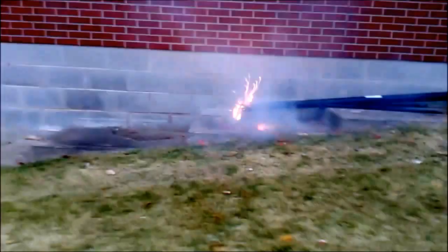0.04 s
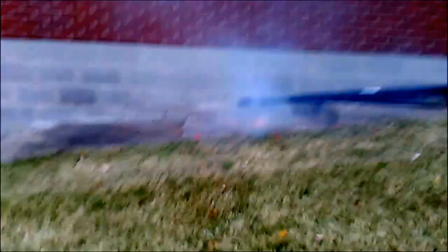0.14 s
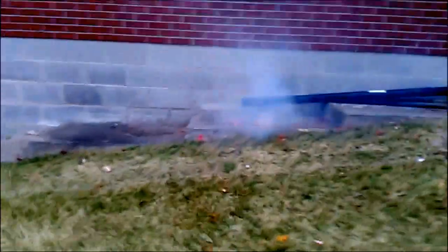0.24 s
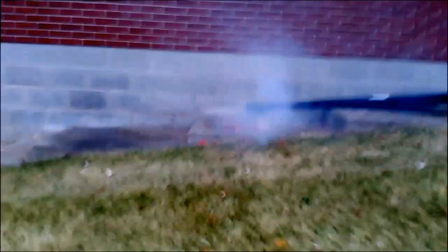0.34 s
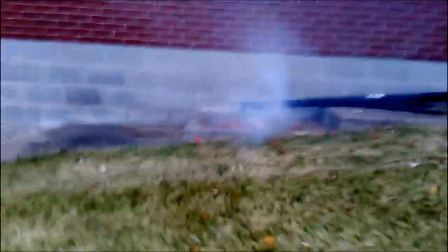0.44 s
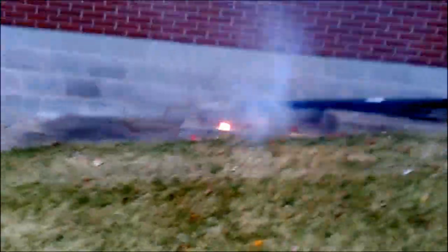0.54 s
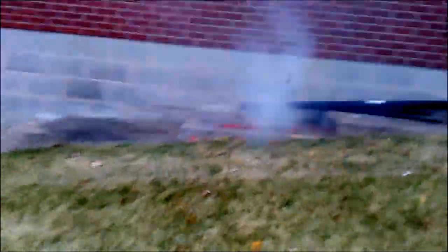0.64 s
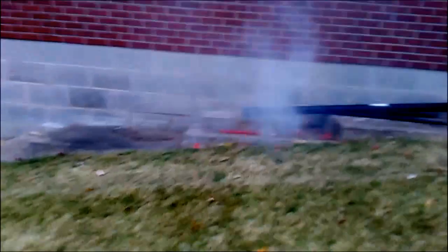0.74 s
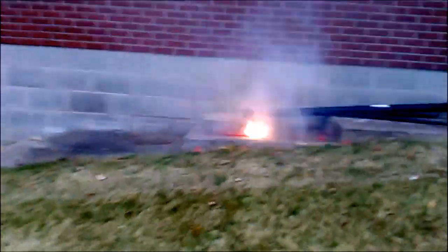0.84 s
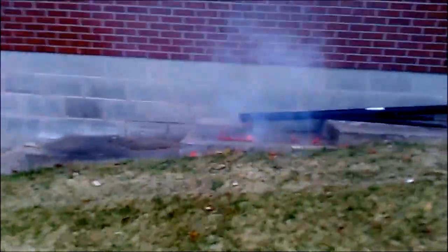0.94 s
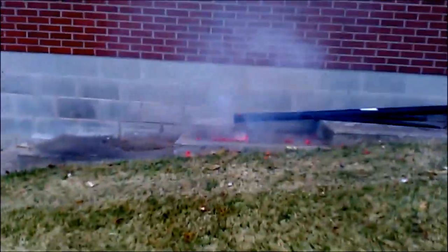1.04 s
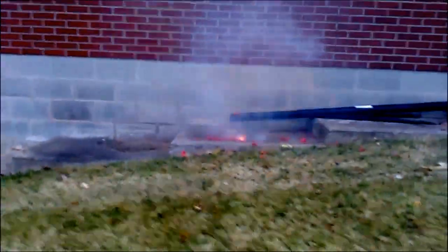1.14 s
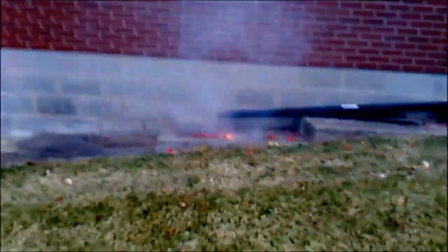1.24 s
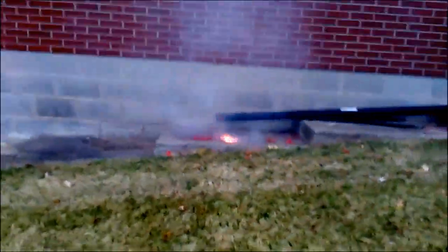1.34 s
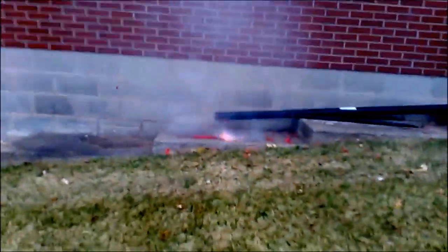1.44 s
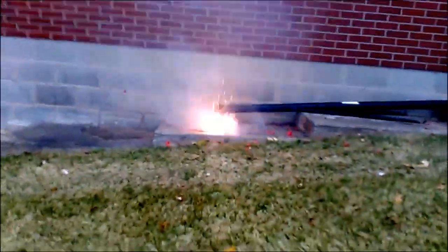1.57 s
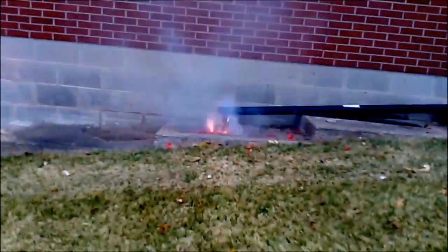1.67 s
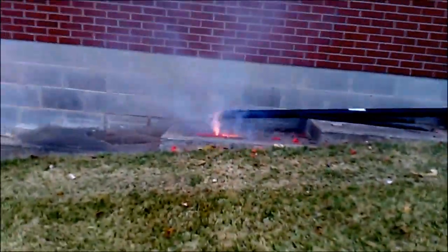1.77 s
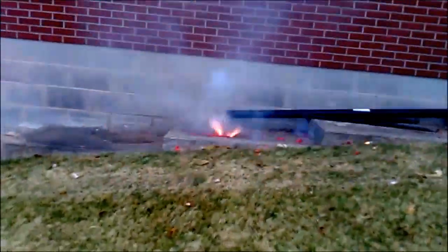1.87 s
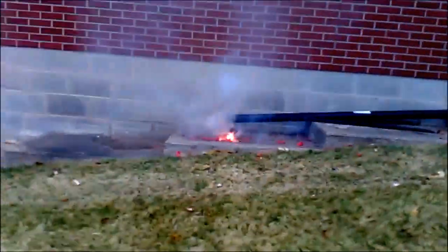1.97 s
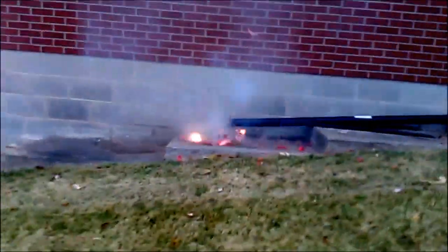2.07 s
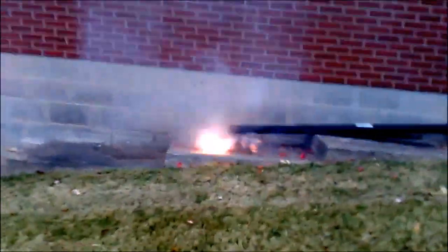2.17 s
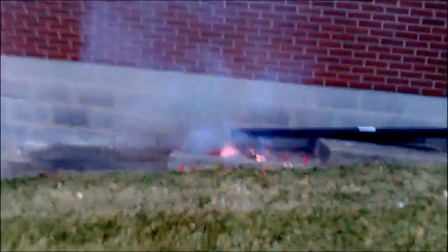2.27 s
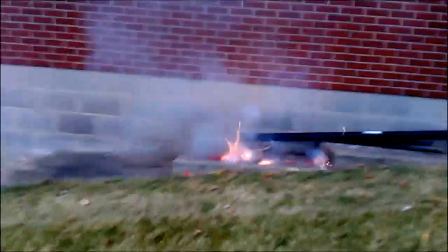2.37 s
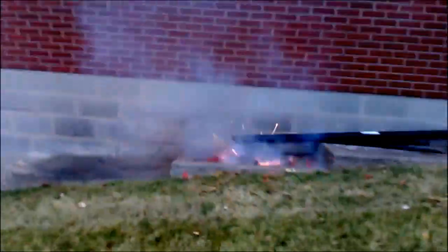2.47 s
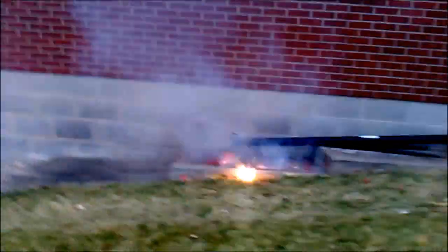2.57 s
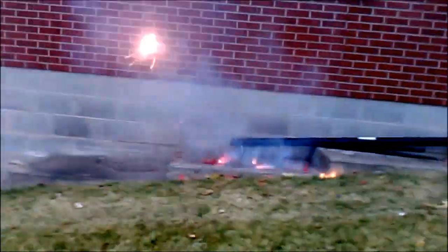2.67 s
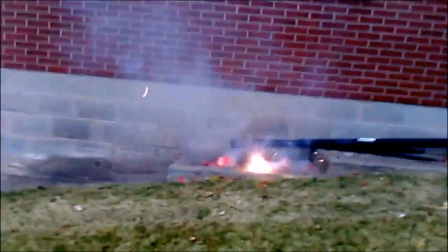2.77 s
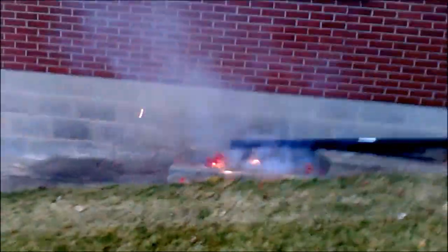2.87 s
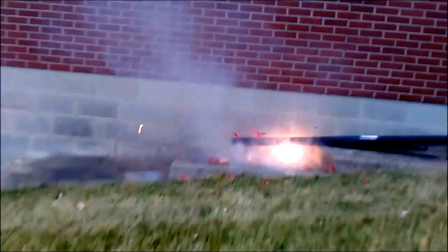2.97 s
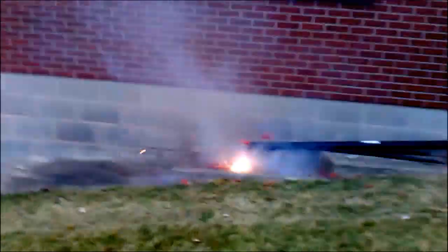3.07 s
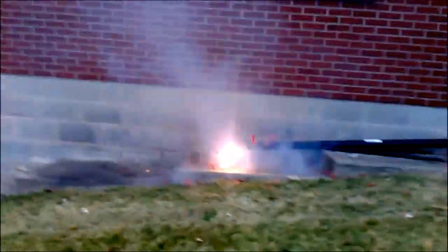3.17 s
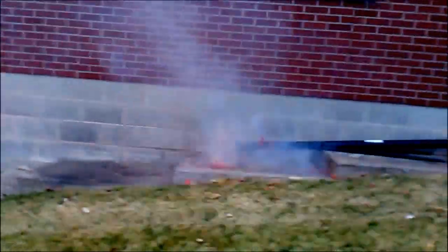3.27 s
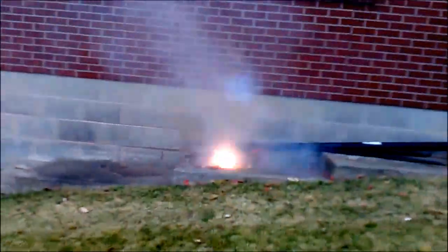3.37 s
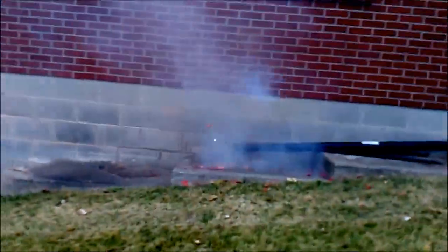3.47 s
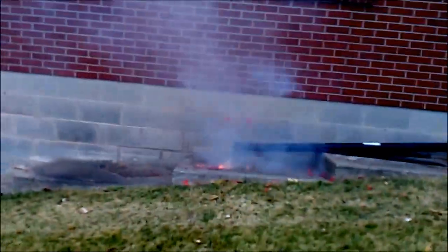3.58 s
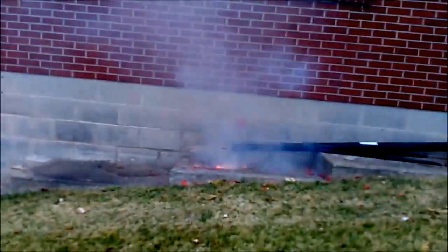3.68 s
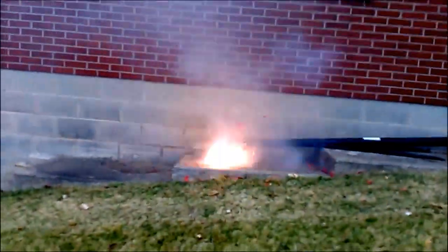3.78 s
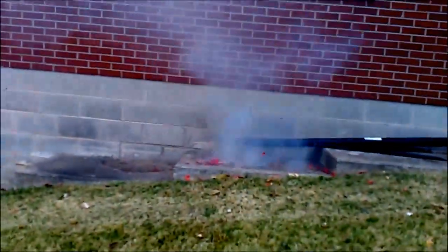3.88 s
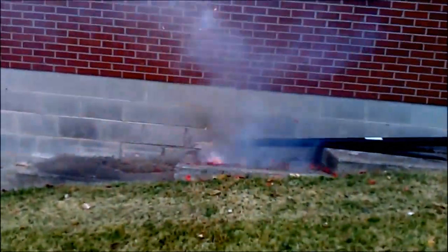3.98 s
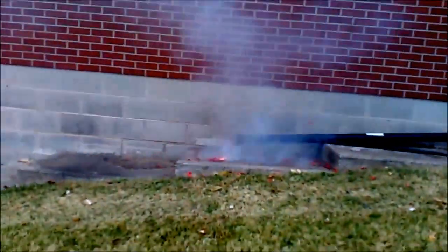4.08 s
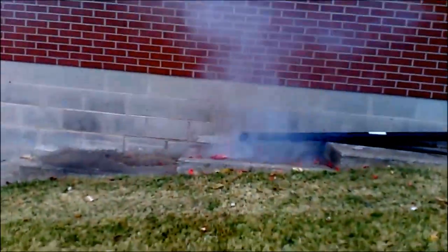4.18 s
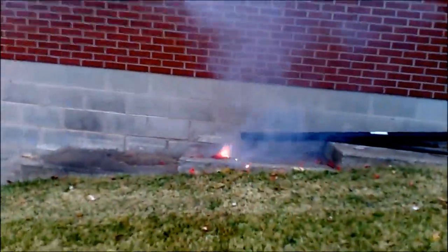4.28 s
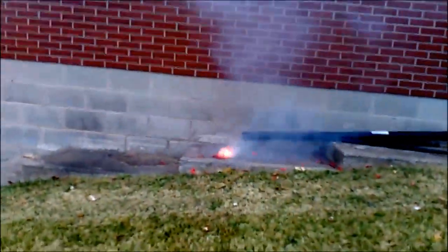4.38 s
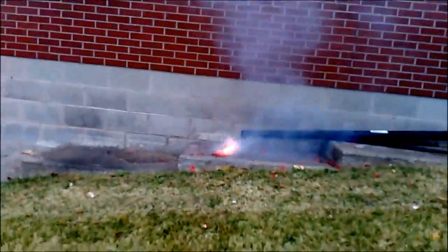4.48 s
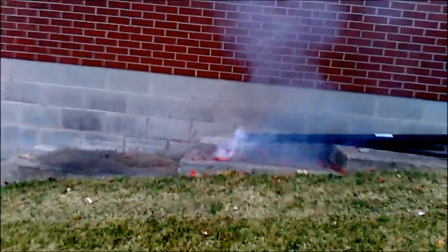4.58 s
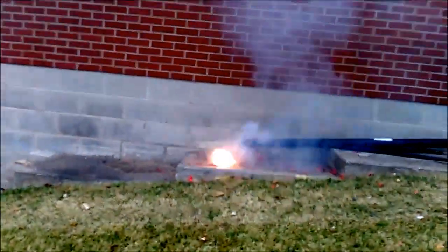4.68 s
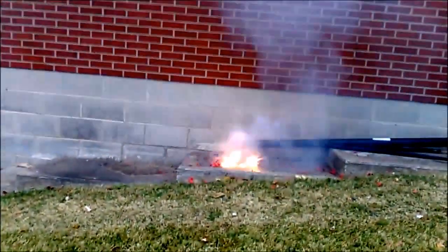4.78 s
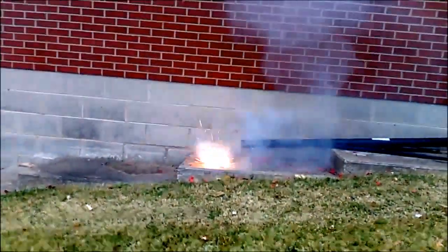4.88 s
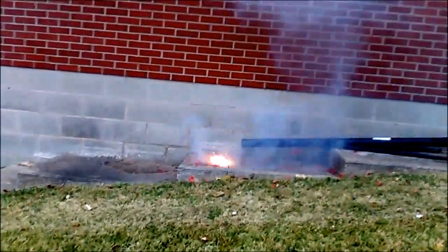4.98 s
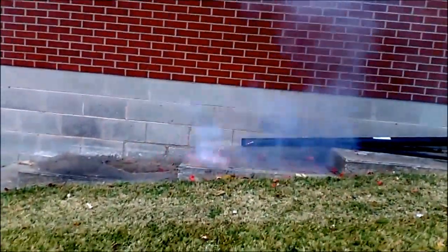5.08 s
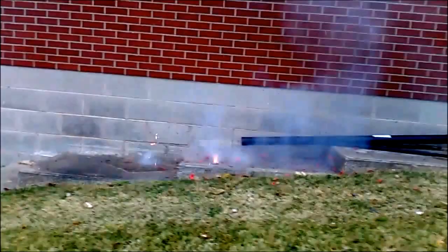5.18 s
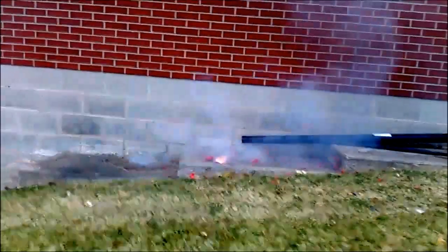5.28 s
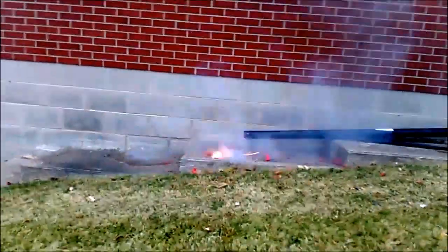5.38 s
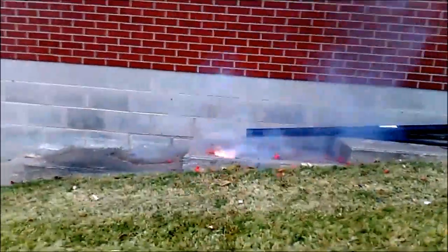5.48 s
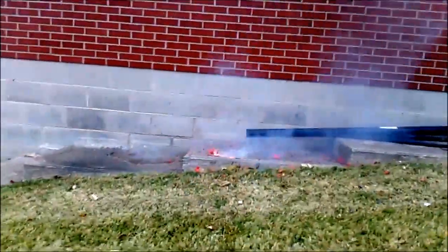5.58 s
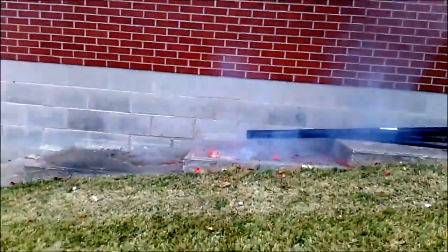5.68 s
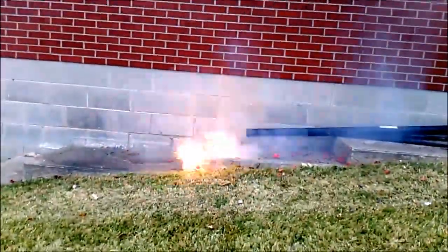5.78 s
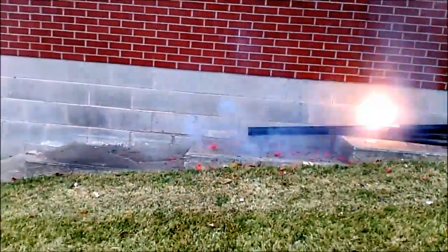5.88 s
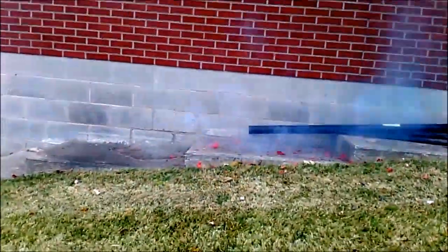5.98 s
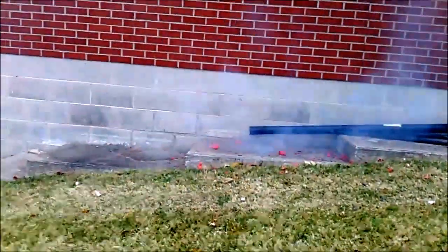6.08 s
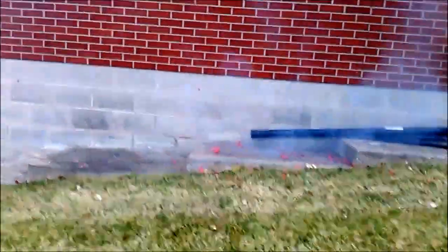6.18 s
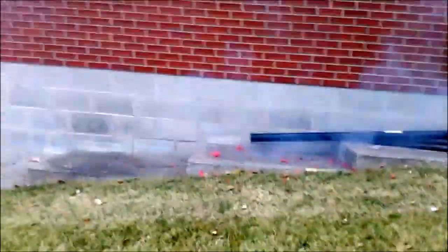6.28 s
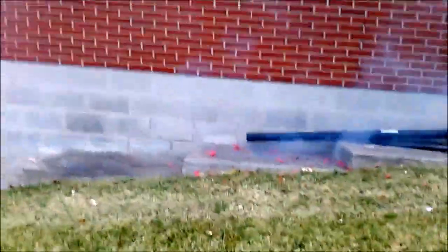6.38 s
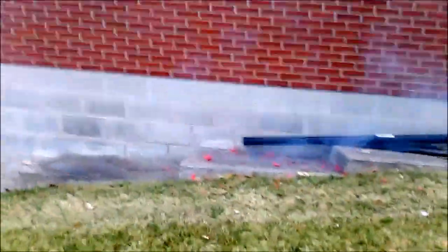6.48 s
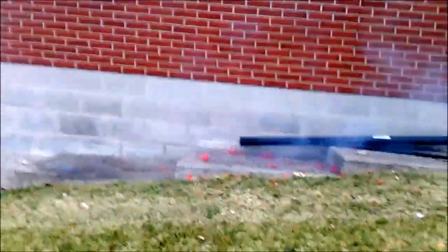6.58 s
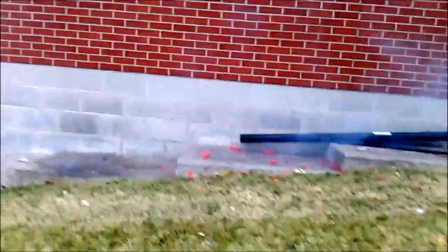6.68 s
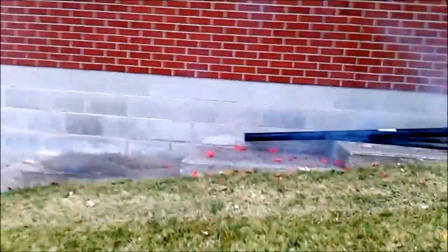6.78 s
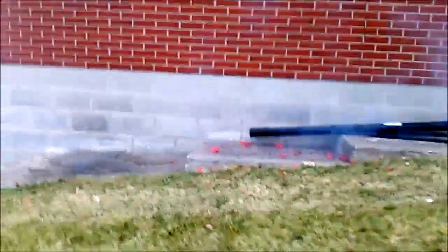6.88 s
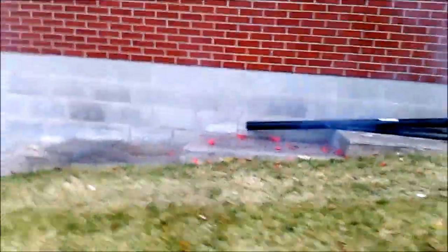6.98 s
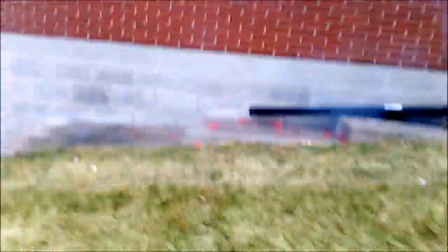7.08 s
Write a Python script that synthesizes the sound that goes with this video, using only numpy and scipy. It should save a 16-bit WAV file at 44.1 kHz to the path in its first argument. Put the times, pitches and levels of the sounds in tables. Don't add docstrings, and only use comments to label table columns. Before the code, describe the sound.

Outdoors beside a brick building, a firecracker string goes off in sharp, irregular bangs, first with small gaps, then almost continuously. Each has a bright wall slap and a duller yard echo. The close stereo microphone is overloaded: the roar is flattened, the right side cuts in and out, and low thumps jolt through. After about six seconds the bangs stop, echoes fade, and faint hiss, a scrap click and a small handling bump remain.

```python
import sys
import numpy as np
from scipy import signal
from scipy.io import wavfile
from scipy.ndimage import uniform_filter1d

SR = 44100
rng = np.random.default_rng(int(sys.argv[2]) if len(sys.argv) > 2 else 0)


def boost(x):
    u = np.asarray(x, float) / 20
    return 10 ** u


def master(y):
    cut = np.clip(np.atleast_2d(y).T, -1, 1)
    pcm = np.round(cut * 32767)
    wavfile.write(sys.argv[1], SR, pcm.astype(np.int16))


N = 314433
STEP = 16


def spikes(times_s, heights):
    out = np.zeros(N)
    places = np.round(np.asarray(times_s) * SR).astype(int).clip(0, N - 1)
    np.add.at(out, places, heights)
    return out


def coarse(times_s, heights):
    return np.add.reduceat(spikes(times_s, heights), np.arange(0, N, STEP))


def fine(envelope):
    held = np.repeat(envelope, STEP, axis=-1)[..., :N]
    return uniform_filter1d(held, size=STEP, axis=-1)


def drift(rate_hz):
    knots = rng.standard_normal(int(N / SR * rate_hz) + 2)
    return np.interp(np.arange(0, N, STEP) / SR * rate_hz, np.arange(len(knots)), knots)


def at_hz(points, hz):
    points_hz, values = np.transpose(points)
    return np.interp(np.log(hz), np.log(points_hz), values)


def dying(power, t60_s):
    keep = boost(-120 * STEP / (t60_s * SR))
    return signal.lfilter([1], [1, -keep], power + 1e-18)


def band(x, kind, hz, order=2):
    return signal.sosfilt(signal.butter(order, hz, kind, fs=SR, output="sos"), x)


def peak(x, hz, width_hz, db):
    r = np.exp(-np.pi * width_hz / SR)
    numerator = np.array([1, 0, -1]) * (1 - r * r) / 2
    denominator = [1, -2 * r * np.cos(2 * np.pi * hz / SR), r * r]
    return x + (boost(db) - 1) * signal.lfilter(numerator, denominator, x)


# start in seconds, strength in dB, share of yard echo in dB, right
# capsule shut in seconds, then relapse in seconds.
CRACK_ROWS = [(0.0198, -52.0, -13, 0.0, 0.023), (0.1316, -22.5, 23, 0.0061, 0.024),
              (0.1514, -19.5, 1.5, 0.053, 0.0082), (0.2036, -23, -7, 0.041, 0.037),
              (0.2249, -36, -24.0, 0.038, 0.1), (0.632, -27, 22, 0.0083, 0.0),
              (0.6894, -6, 6, 0.11, 0.035), (0.8219, -12.5, -5, 0.075, 0.006),
              (0.963, -5, 0.5, 0.11, 0.1), (1.2342, -18, 9, 0.033, 0), (1.3462, -15, 5, 0.083, 0.081),
              (1.707, -8, 11, 0.091, 0.0015), (1.7794, -10, -9, 0.11, 0.078),
              (1.9559, -14, 6, 0.099, 0.048), (2.0536, -22.5, 15, 0.032, 0.0012),
              (2.0995, -30.0, 12, 0.0018, 0.056), (2.1519, -13.0, -1, 0.073, 0.029),
              (2.2297, -16, -2.0, 0.07, 0.018), (2.2994, -4, 4, 0.062, 0.078),
              (2.4586, -18.0, -12.5, 0.054, 0.018), (2.5086, -12.0, -7.5, 0.061, 0.034),
                 (2.599, -12, 3.0, 0.081, 0.0078), (2.7149, -9.5, 7.5, 0.095, 0.043),
                 (2.8099, -20, 0.0, 0.051, 0.051), (2.902, -5, -10, 0.083, 0.03),
                 (2.9723, -9, -4, 0.084, 0.038), (3.0426, -12, -23, 0.034, 0.012),
                 (3.0593, -15.5, -5.0, 0.07, 0.018), (3.1291, -9, -13.0, 0.061, 0.03),
                 (3.1858, -27, 2, 0.024, 0.024), (3.2, -14.5, -6.0, 0.075, 0.0043),
                 (3.2694, -15, 0.0, 0.062, 0.025), (3.3175, -20.5, 18.5, 0.081, 0.045),
                 (3.436, -16, -4.0, 0.083, 0.03), (3.5183, -11, -7, 0.041, 0.038),
                 (3.5902, -6.5, 7, 0.11, 0.077), (3.908, -8, 2.0, 0.08, 0.082),
                 (4.081, -8.5, 2, 0.076, 0.093), (4.2834, -18.5, 14.5, 0.069, 0.006),
              (4.3717, -25, 14.5, 0.011, 0.019), (4.6465, -15.5, 8.0, 0.0025, 0.053),
               (4.736, -22, -6.0, 0, 0), (4.822, -11, -21.5, 0, 0.088), (4.901, -4, -12.0, 0.078, 0.00076),
               (4.9846, -11, 9, 0, 0.1), (5.049, -27, 3, 0.015, 0.065), (5.119, 2, -37, 0.088, 0.000071),
               (5.1984, 0, 4.5, 0.062, 0.012), (5.2344, -21, -1, 0.061, 0), (5.28, -16, -32, 0.11, 0.034),
               (5.348, -12.5, -25, 0.0694, 0.055), (5.4858, -18.5, 7, 0.028, 0.017),
               (5.8559, -15, -16, 0.0067, 0.05), (5.914, -16.5, 3.0, 0.043, 0.0),
               (6.0155, -16, 16.5, 0.092, 0.032), (6.1397, -26, 8, 0.046, 0.091)]
CRACKS = CRACK_ROWS
CRACKS_S = np.array(CRACKS)[:, 0]
# frequency in Hz, density in dB per Hz.
WALL_DB = [(88, -30), (150, -2.5), (398, -3.5), (484, -2), (578, -1.5), (1790, -2), (2180, -2.5),
           (9820, -10), (14800, -20.5), (16000, -1)]
YARD_DB = [(88, -64), (150, -13.5), (414, -8.5), (504, -14), (1240, -13), (2500, -7.5), (4320, -12),
           (8730, -18), (11900, -32), (16000, -40)]
# frequency in Hz, time to fall 60 dB in seconds.
WALL_T60_S = [(200, 0.2), (2000, 0.27), (8000, 0.19), (15000, 0.13)]
YARD_T60_S = [(200, 0.39), (1000, 0.82), (2500, 0.67), (5000, 0.57), (9000, 0.64), (15000, 0.66)]
YARD_SIDE_DB = [4, 1]
YARD_SIDE_LENGTH = [0.74, 1.148]
# lag in seconds, level in dB.
HOUSES = [
    (0.103, -14.5),
    (0.198, -9.5),
    (0.359, -30.5),
]
# frequency in Hz, width in Hz, boost in dB.
WINDOW_WELL = [(494, 22, 6), (980, 94, 1), (1799, 30, 5.5)]
CEILING_DB = [-14.5, -17.5]


def house_answers(far_power, hz):
    air_db_per_s_khz, bass_cut_hz = 13, 1200
    total = 0
    for lag_s, db in HOUSES:
        answer = coarse(CRACKS_S + lag_s, far_power * boost(db))
        total = total + answer * boost(-air_db_per_s_khz * lag_s * hz / 1000)
    return total / (1 + (bass_cut_hz / hz) ** 2)


def wall_echo(power, hz):
    hold_s = 0.028
    ends = coarse(CRACKS_S + hold_s, power)
    held = np.cumsum(coarse(CRACKS_S, power) - ends).clip(0)
    return held + dying(ends, at_hz(WALL_T60_S, hz))


def yard_echo(power, hz):
    t60_s = at_hz(YARD_T60_S, hz)
    sides = [dying(dying(power, t60_s * long), t60_s * long) for long in YARD_SIDE_LENGTH]
    return np.array(sides) * STEP / (t60_s * SR) * 30


def roar():
    strength_db, far_db = np.transpose(CRACKS)[1:3]
    white = rng.standard_normal((2, 2, N))
    edges_hz = 140 * 2 ** np.arange(0, 7.1, .5)
    colour_db = 1.37 * rng.standard_normal((len(CRACKS), len(edges_hz)))
    far_power = boost(2 * (strength_db + far_db))
    open_yard = coarse(CRACKS_S, far_power) + coarse([0], boost(-19.0))
    out, total_power = 0, 1e-12
    for k, (low, high) in enumerate(zip(edges_hz, edges_hz[1:])):
        hz = np.sqrt(low * high)
        wall = wall_echo(boost(2 * (strength_db + colour_db[:, k])), hz)
        yard = yard_echo(open_yard + house_answers(far_power, hz), hz)
        wall_gain = boost(2 * (at_hz(WALL_DB, hz) + 20.5))
        yard_gain = boost(2 * (at_hz(YARD_DB, hz) + 5.5 + np.c_[YARD_SIDE_DB]))
        power = wall_gain * wall + yard_gain * yard
        envelope = fine(np.sqrt(power) * boost(1.34 * drift(30)))
        out = out + envelope * band(white[k % 2], "band", [low, high])
        total_power = total_power + power * (high - low) * 2 / SR
    for hz, width_hz, db in WINDOW_WELL:
        out = peak(out, hz, width_hz, db)
    squeeze = (1 + (total_power / boost(2 * np.c_[CEILING_DB])) ** 0.85) ** -.55
    grain = boost(3.76 * uniform_filter1d(rng.standard_normal(total_power.shape), size=4))
    return 0.56 * np.tanh(out * fine(squeeze * grain) / .5)


def fronts():
    n_wave = -np.linspace(1, -1, 40)
    shocks = np.convolve(spikes(CRACKS_S, 0.39), n_wave)[:N]
    return boost(-7.0) * band(shocks, "low", 7000)


REBOUNDS_S = [.206, 0.7385, 0.872, 1.0057, 1.391, 1.756, 2.197, 2.4999, 2.522, 2.6496, 2.9695, 3.1288,
              3.226, 3.328, 3.491, 3.5337, 3.6542, 3.9513, 4.1149, 4.327, 4.8755, 4.9353, 4.9922, 5.02,
              5.2095, 5.293, 5.3855, 5.4992, 5.872, 6.068]
LEAK = (-13, .004, 0.02)
GASP = (-.3, 0.0065, 0.029)
RECOVERY = (0.95, 0.04, 0.015)
POP = (-14, 0.0086, 0.0089)


def openings():
    gasp_hold_s = 0.012
    rows = [(s, s, *POP) for s in REBOUNDS_S]
    next_s = [*CRACKS_S[1:], N / SR]
    for (s, _, _, shut_s, relapse_s), until in zip(CRACKS, next_s):
        gasp = s + shut_s
        back = gasp + relapse_s
        stages = [(s, s, LEAK), (gasp, gasp + gasp_hold_s, GASP), (back, until, RECOVERY)]
        for start, end, (db, rise_s, fall_s) in stages:
            missed_db = 40 * max(start - until, 0) / rise_s
            rows.append((min(start, until), min(end, until), db - missed_db, rise_s, fall_s))
    return rows


def chokes(rows, t):
    sink_db_per_s, release_db_per_s = 700, 4997
    out = np.zeros(len(t))
    for s, held_s, db in rows:
        before_db = sink_db_per_s * (s - t)
        after_db = release_db_per_s * (t - s - held_s)
        out = np.minimum(out, db + np.maximum(0, np.maximum(before_db, after_db)))
    return out


# start in seconds, held in seconds, gain in dB.
LEFT_CHOKE = [(0.212, 0.0096, -11), (0.277, 0.017, -8), (1.48, 0.035, -4.5), (2.133, 0.0051, -9.5),
              (3.048, 0.0028, -8), (3.989, 0.0051, 4), (4.06, 0.026, -5), (4.725, 0.0069, -12),
              (4.924, 0.011, -10.5), (4.98, 0.0048, -13), (6.128, 0.0086, -7)]
# start in seconds, held in seconds, gain in dB.
RIGHT_CHOKE = [
    (.94, 0.011, -3),
    (4.742, 0.0024, -16),
    (5.57, 0.0092, -15),
]


def capsule_gain():
    t = np.arange(0, N, STEP) / SR
    right_db = np.full(len(t), -78.)
    for start, end, db, rise_s, fall_s in openings():
        away = np.maximum(0, np.maximum((start - t) / rise_s, (t - end) / fall_s))
        right_db = np.maximum(right_db, db - 40 * away)
    gain_db = np.array([chokes(LEFT_CHOKE, t), right_db + chokes(RIGHT_CHOKE, t)])
    return fine(boost(gain_db))


SLAMS_S = [0.1328, 0.1508, 0.6328, 1.2347, 1.3467, 1.7073, 1.796, 2.056, 2.2936, 2.332, 2.511, 2.8063,
           2.8218, 3.0423, 3.1854, 3.2658, 3.5177, 3.589, 4.081, 4.0978, 4.6485, 4.8314, 4.9018, 5.0046,
           5.2346, 5.283, 5.3437, 5.8564, 5.9154, 6.139]
# start in seconds, length in seconds, step height.
FLUTTERS = [
    (0.049, .082, 0.42),
    (0.406, .062, 0.33),
    (1.764, .02, 0.18),
    (1.833, .006, 0.22),
    (2.01, .006, 0.2),
    (2.767, .012, .12),
]


def right_shoves():
    gap_s = .011
    out = spikes(SLAMS_S, -0.44) + spikes(REBOUNDS_S, 0.44)
    turn = np.arange(12)
    for s, length_s, height in FLUTTERS:
        ages_s = gap_s * (turn + 0.42 * rng.random(len(turn)))
        pushes = height * (-1.) ** (turn // 2) * (ages_s < length_s)
        out = out + band(spikes(s + ages_s, pushes), "low", 450)
    return out


# start in seconds, step height.
LEFT_SHOVES = [(0.0303, -0.49), (0.0956, -0.43), (0.103, -0.66), (0.107, -0.79), (0.206, 0.44),
               (0.2895, 0.48), (0.2946, 0.47), (0.297, -0.29), (0.6351, 0.3), (1.207, -0.38),
               (1.3468, -0.31), (1.6143, -0.27), (1.709, 0.17), (2.1343, -0.46), (2.2367, 0.38),
               (2.717, -0.52), (2.7217, -0.19), (2.7333, -0.3), (3.232, -0.35), (3.272, -0.29),
               (3.4354, -0.56), (3.4422, 0.17), (4.2852, -0.4), (4.291, -0.34), (4.649, -0.35),
               (4.739, 0.28), (4.8383, 0.38), (5.4892, 0.51), (5.859, 0.47), (6.128, 0.77)]


def shoves():
    left = np.cumsum(spikes(*np.transpose(LEFT_SHOVES)))
    right = np.cumsum(right_shoves())
    steps = np.array([band(left, "low", 700, order=1), band(right, "low", 2000, order=1)])
    sag_heights = rng.standard_normal((2, len(CRACKS)))
    sags = np.array([np.cumsum(spikes(CRACKS_S, side)) for side in sag_heights])
    thumps = boost(np.c_[[1.5, .5]]) * band(steps, "high", 97, order=5)
    deep = band(band(sags, "high", 51, order=4), "low", 220)
    return thumps + boost(np.c_[[-23, -19.5]]) * deep


# start in seconds, left height, right height.
SCRAPS = [
    (.2036, .2, .6),
    (.4338, .3, .6),
    (.5052, .35, .62),
    (4.5725, .3, .45),
    (6.4345, .45, .5),
]


def scraps():
    s, *heights = np.transpose(SCRAPS)
    clicks = np.array([spikes(s, side) for side in heights])
    return boost(23.5) * band(clicks, "band", [1500, 3400])


# time in seconds, level in dB.
WIND = [(0, -31), (.15, -49), (.3, -46), (.55, -43.5), (.7, -55.5), (4.4, -51), (6.4, -67), (6.6, -71),
        (6.8, -63.5), (6.87, -66), (7.13, -61)]


def background():
    t = np.arange(N) / SR
    s, db = np.transpose(WIND)
    rumble = band(rng.standard_normal((2, N)), "band", [45, 120], order=3)
    wind = boost(np.interp(t, s, db) + 32.5) * rumble
    age = (t - 7.002).clip(0) / .012
    falling_tone = np.sin(2 * np.pi * (0.74 * age - 2.0 * np.exp(-age)))
    bump = boost(-22.5) * age * np.exp(-age) * falling_tone
    knock = band(spikes([6.717], boost(-2)), "band", [550, 950])
    return wind * boost(np.c_[[3, -5]]) + (bump + knock) * boost(np.c_[[0, -15]])


def hiss():
    white = rng.standard_normal((2, N))
    return boost(-62.5) * band(white, "high", 250) + boost(-60.0) * band(white, "band", [300, 3500])


def scene():
    through_capsules = (roar() + fronts() + hiss()) * capsule_gain()
    return through_capsules + shoves() + scraps() + background()


def roll_off(x):
    return signal.sosfilt(signal.butter(12, 16830, fs=SR, output="sos"), x)


def record(dry):
    rounded = .75 * np.tanh(dry / .75)
    top_cut = signal.cheby2(18, 45, 16100, fs=SR, output="sos")
    return roll_off(signal.sosfilt(top_cut, rounded))


dry = scene()
out = record(dry)
master(out)
```